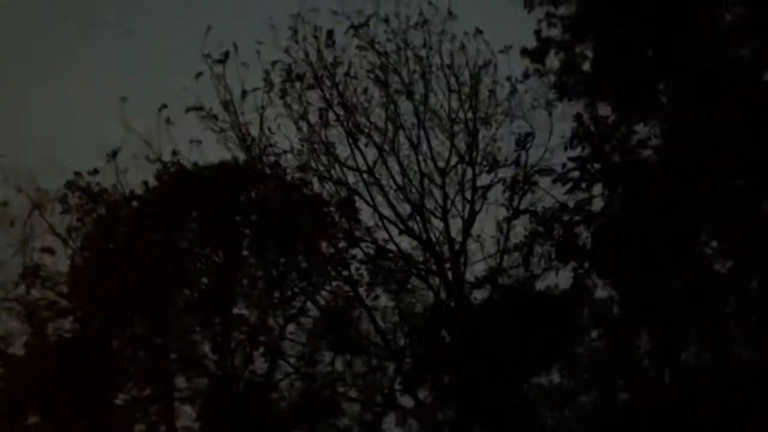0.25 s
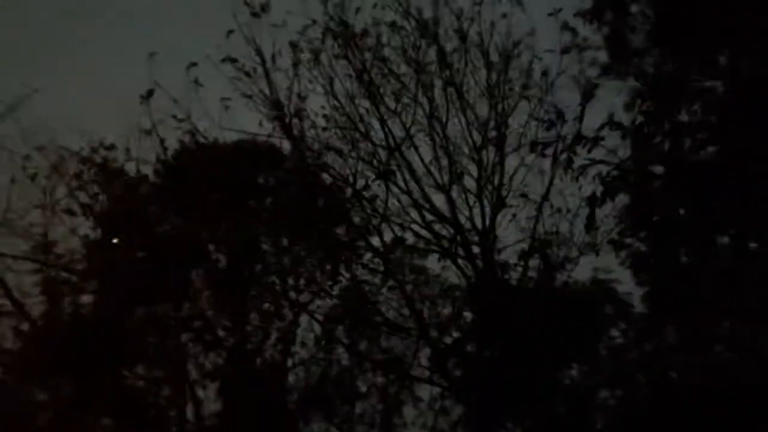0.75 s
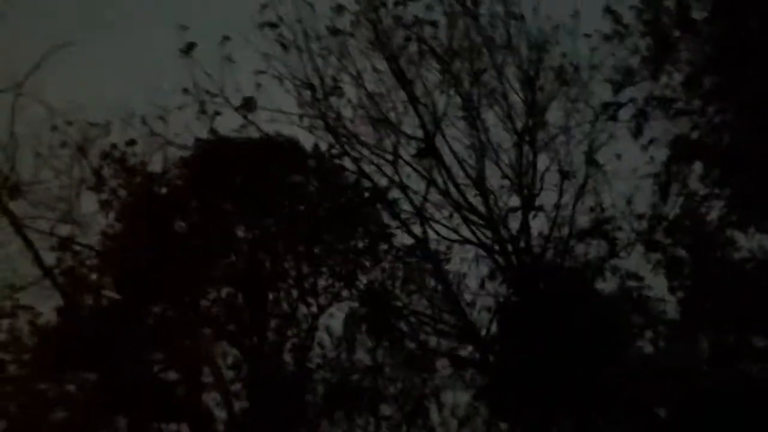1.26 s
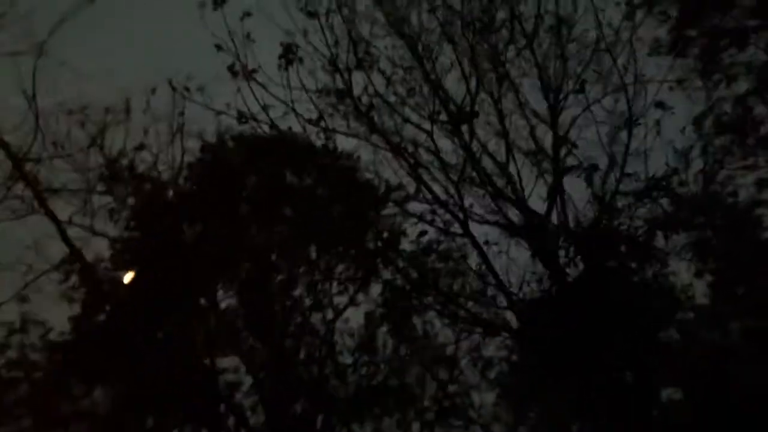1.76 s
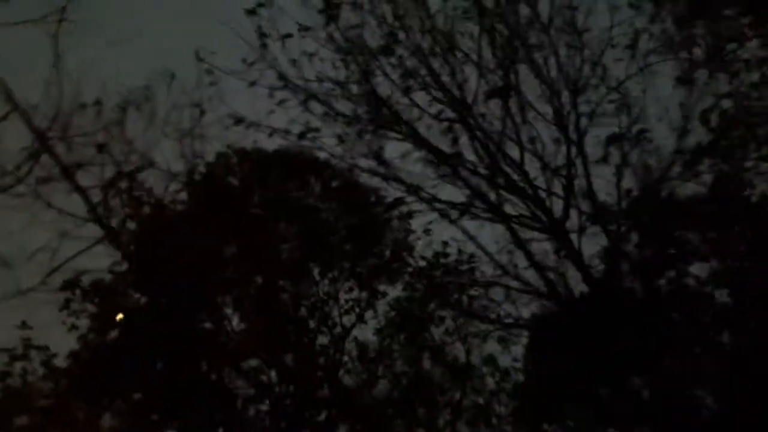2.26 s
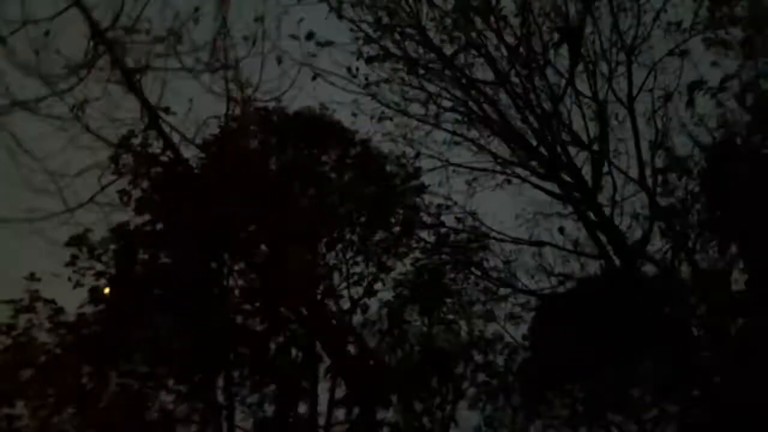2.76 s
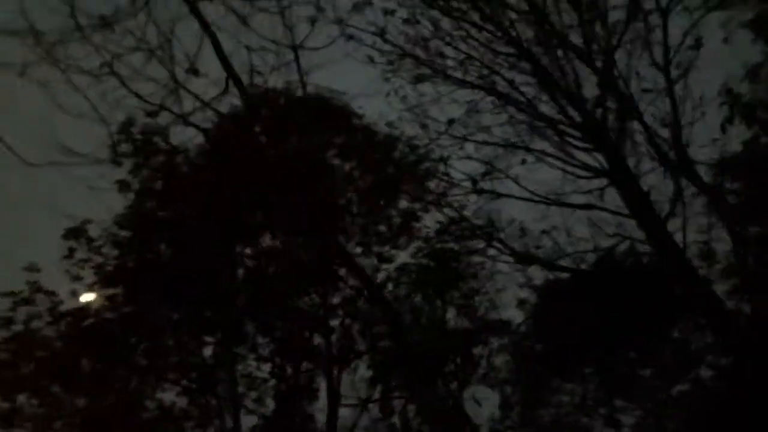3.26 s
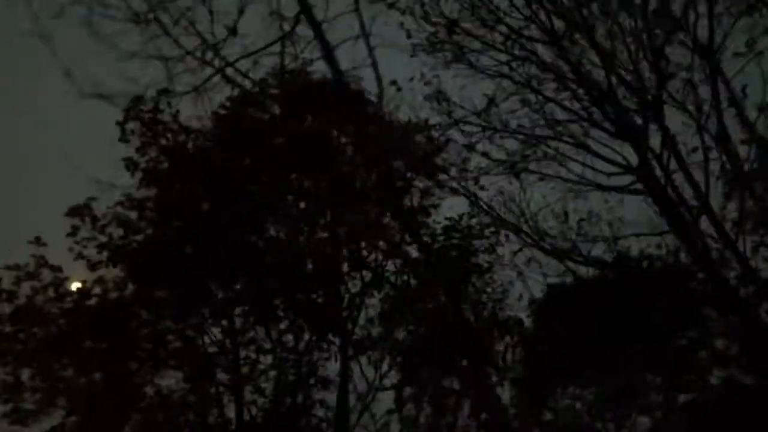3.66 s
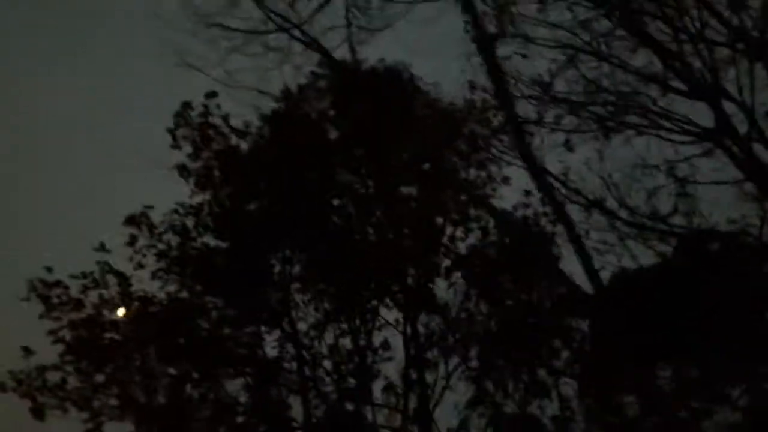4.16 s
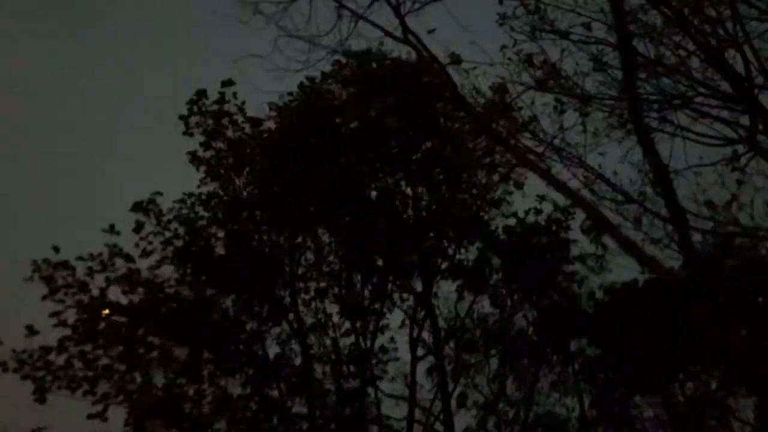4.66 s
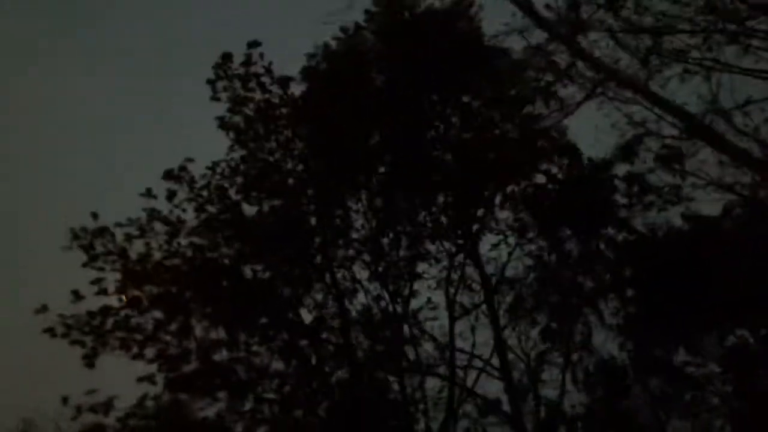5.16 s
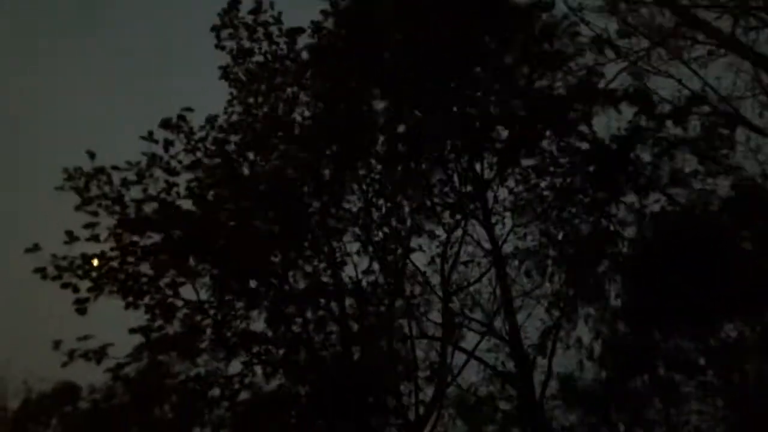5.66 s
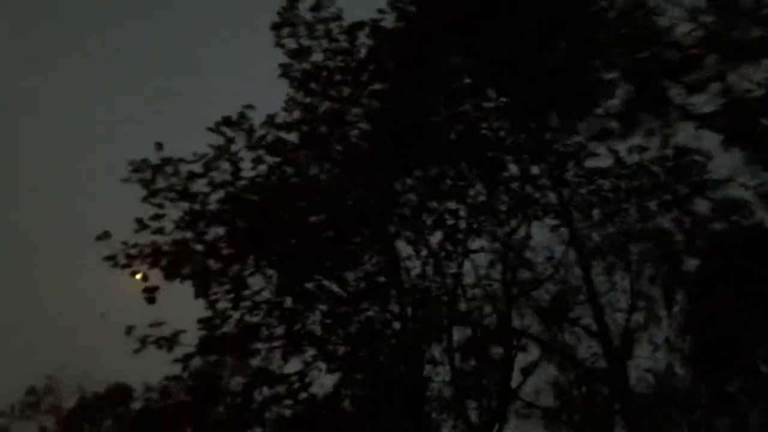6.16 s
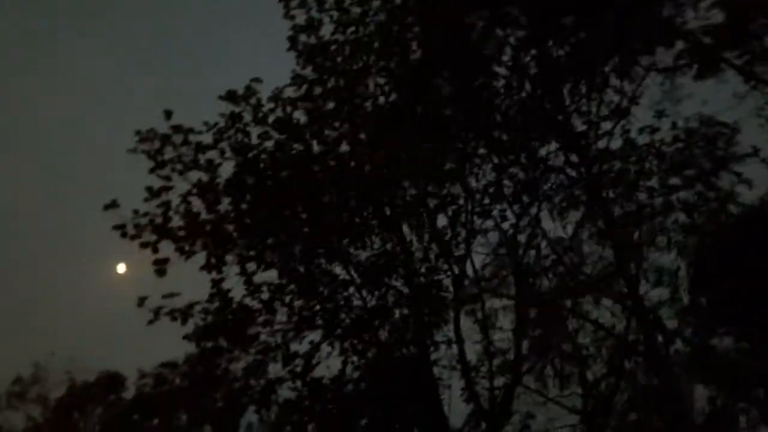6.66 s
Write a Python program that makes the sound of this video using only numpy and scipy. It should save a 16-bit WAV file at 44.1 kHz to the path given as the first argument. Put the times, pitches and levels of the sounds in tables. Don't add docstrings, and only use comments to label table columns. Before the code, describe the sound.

Thousands of birds twitter together in a continuous bright wash outdoors, pierced by close pips, swoops and hoarse calls, with light taps on the microphone.

```python
import sys
import numpy as np
from scipy import signal
from scipy.fft import rfft, irfft
from scipy.io import wavfile

SR = 44100
rng = np.random.default_rng(int(sys.argv[2]) if len(sys.argv) > 2 else 0)


def makeup_ratio(level_db):
    decades = np.asarray(level_db, float) / 20
    return 10 ** decades


def dump_mix(stems):
    frames = np.atleast_2d(stems).T
    limited = np.clip(frames, -1, 1)
    pcm = np.round(limited * 32767).astype(np.int16)
    wavfile.write(sys.argv[1], SR, pcm)


N = 304290


def rms_one(x):
    return x / np.sqrt(np.mean(x ** 2) + 1e-20)


def at_hz(points, hz):
    points_hz, level_db = np.transpose(points)
    return np.interp(np.log(hz), np.log(points_hz), level_db)


def drift(rate_hz):
    coarse = 40
    pole = np.exp(-2 * np.pi * rate_hz * coarse / SR)
    noise = rng.standard_normal(N // coarse + 2002)
    slow = signal.lfilter([1], [1, -2 * pole, pole * pole], noise)[2000:]
    return np.interp(np.arange(N) / coarse, np.arange(len(slow)), rms_one(slow))


def band_pass(x, order, low_hz, high_hz):
    return signal.sosfilt(signal.butter(order, [low_hz, high_hz], "band", fs=SR, output="sos"), x)


def glided(notes, per_s=0, sag=0):
    start, length, hz, level_db = np.transpose(notes)[:4]
    half = per_s * length / 2
    first_hz = hz * (1 - sag - half)
    last_hz = hz * (1 - sag + half)
    return np.transpose([start, length, first_hz, hz, last_hz, level_db])


def whistles(notes, edge, hoarse, hoarse_rate):
    start, length, first_hz, mid_hz, last_hz, level_db = np.array(notes, float).T[:, :, None]
    start, length = start - edge * length / 2, length * (1 + edge)
    steps = np.arange(int(length.max() * SR) + 1)
    u = np.clip(steps / SR / length, 0, 1)
    hz = first_hz * (1 - u) * (1 - 2 * u) + mid_hz * 4 * u * (1 - u) + last_hz * u * (2 * u - 1)

    chance = rng.random((len(notes), 2))
    shake_from = (chance[:, :1] * N).astype(int)
    shake = hoarse * drift(hoarse_rate)[(shake_from + steps) % N]
    phase = 2 * np.pi * (np.cumsum(hz, axis=1) / SR + chance[:, 1:]) + shake
    tone = (1 + shake[::-1] / 2) * np.sin(phase)
    soft_edges = np.clip(np.minimum(u, 1 - u) / edge, 0, 1)
    swell = np.sqrt(np.sin(np.pi * u).clip(0)) * soft_edges

    swell_energy = np.sum(swell ** 2, axis=1, keepdims=True)
    note_energy = np.sum((swell * tone) ** 2, axis=1, keepdims=True)
    gain = makeup_ratio(level_db) * np.sqrt(swell_energy / note_energy)
    at = np.clip((start * SR).astype(int) + steps, -1, N) % (N + 1)
    return np.bincount(at.ravel(), (gain * swell * tone).ravel(), N + 1)[:N]


def wash(spectrum, low_hz, patchy_db, patch_rate, swell_db, count):
    white, together, out = rng.standard_normal((2, N)), drift(7.4), 0
    edges = low_hz * 2 ** (np.arange(count + 1) / 4)
    for k, (low, high) in enumerate(zip(edges, edges[1:])):
        band = band_pass(white[k % 2], 3, low, high)
        patches_db = patchy_db * (0.51 * together + drift(patch_rate))
        out = out + band * makeup_ratio(swell_db(np.sqrt(low * high)) + patches_db)
    hz = np.maximum(np.fft.rfftfreq(N, 1 / SR), 10)
    return rms_one(irfft(rfft(out) * makeup_ratio(at_hz(spectrum, hz)), N))


# t/s, level/dB
ROOST_SWELL = [(0.0, -28.5), (0.57, -30), (1.04, -28.5), (1.29, -29.5), (2.59, -29), (3.02, -30),
               (3.52, -30), (3.76, -30.5), (4.63, -30), (4.86, -30), (5.01, -31), (5.65, -31),
               (5.78, -30.5), (6.34, -30), (6.9, -30)]
VOICE_HZ = [1700, 3000, 3850, 4650, 6400, 11000]
ROOST_FOLLOW = [0.9, .5, 0.37, .5, .4, 1]
# t/s, level/dB
LOW_BOUTS = [(.6, 4.5), (1.35, 5.5), (2.25, 4), (2.8, 3.5), (3.2, -2), (3.4, 2.5), (3.9, 0.5), (4.5, 5),
             (5.35, 2.5), (5.6, -3), (6., -2), (6.4, 2)]
MIDDLE_BOUTS = [
    (.5, 0.92),
    (.95, -0.71),
    (1.9, 0.7),
    (2.45, 1.5),
    (3.0, -1),
    (3.6, -1.5),
    (4.5, -1),
    (5.2, -0.32),
    (6.4, 1),
]
BRIGHT_BOUTS = [
    (.2, -1),
    (1.55, -1.2),
    (1.95, 1),
    (2.65, 1.5),
    (3.05, -0.52),
    (3.55, 1.8),
    (3.95, -2.3),
    (5.35, -0.2),
    (6.05, 1.4),
    (6.8, 0.35),
]
SHRILL_BOUTS = [(.25, -1.8), (.75, 0.6), (1.25, 1.2), (1.8, 2.1), (2.75, 0.84), (3.4, 1), (3.82, -1.5),
                (4.1, .8), (4.75, 0.74), (5.45, -2.7), (6.3, 0.13), (6.85, -1.7)]
HIGH_BOUTS = [(1.05, 1), (1.35, 1), (1.8, 1), (2.2, 0.5), (2.6, 0.5), (3.2, 1.5), (4.2, -1), (4.75, 0),
              (5.4, 2.5), (5.6, -3), (6.2, 3.5)]
OVERTONE_BOUTS = [
    (.8, 2),
    (1.25, 4),
    (1.9, 6.5),
    (2.4, 3.5),
    (3.35, 2),
    (5.5, -2),
    (6., -0.5),
    (6.4, 2),
]


def liveliness_db(s, hz):
    bout_s = 0.27
    times, level_db = np.transpose(ROOST_SWELL)
    roost_db = np.interp(s, times, level_db) - level_db.mean()
    place = np.interp(np.log(hz), np.log(VOICE_HZ), np.arange(len(VOICE_HZ)))
    ranges = [LOW_BOUTS, MIDDLE_BOUTS, BRIGHT_BOUTS, SHRILL_BOUTS, HIGH_BOUTS, OVERTONE_BOUTS]
    out = 0
    for k, bouts in enumerate(ranges):
        share = np.clip(1 - abs(place - k), 0, 1)
        if np.any(share):
            bout_db = sum(np.interp(s, [at - bout_s, at, at + bout_s], [0, db, 0]) for at, db in bouts)
            out = out + share * (ROOST_FOLLOW[k] * roost_db + bout_db)
    return out


# f/Hz, level/dB (per Hz)
CHORUS_COLOUR = [(800, -31.5), (1400, -10.5), (2400, -6.5), (3050, -1.5), (3500, -2), (4650, -0.5),
                 (5200, -8.5), (6200, -11), (7600, -15.5), (7800, -27), (7950, -32.5), (8500, -27),
                 (9800, -44), (11800, -37), (13400, -48), (14800, -48.5)]


def far_flock(spread_db, glide, count=5200):
    when, pitch, length = rng.random((count, 3)).T
    bend, slope, size = rng.standard_normal((count, 3)).clip(-2, 2).T
    s = when * (N / SR + .05) - .05
    hz = 950 + 14700 * pitch ** 1.5
    density_db = 5 * np.log10(pitch + .02)
    level_db = at_hz(CHORUS_COLOUR, hz) + liveliness_db(s, hz) + spread_db * size + density_db
    first_hz, last_hz = hz * (1 - glide * slope), hz * (1 + glide * slope)
    mid_hz = hz * (1 + glide * bend / 2)
    notes = np.transpose([s, .02 + 0.067 * length ** 2, first_hz, mid_hz, last_hz, level_db])
    return rms_one(whistles(notes, .3, .3, 100))


def roost_wash(s):
    scold_db, scold_from_hz = scolding_db(s), 5000

    def swell_db(hz):
        return liveliness_db(s, hz) + scold_db * (hz > scold_from_hz)

    return makeup_ratio(-31.5) * wash(CHORUS_COLOUR, 600.7, 0.24, 4.7, swell_db, count=19)


def trees(x, t60):
    s = np.arange(SR // 2) / SR
    tail = rng.standard_normal(len(s)) * makeup_ratio(-60 * s / t60) * (s > .008)
    return signal.fftconvolve(x, tail / np.sqrt(np.sum(tail ** 2)))[:N]


# f/Hz, level/dB (per Hz)
AIR_COLOUR = [(25, -37), (60, -15), (100, -13), (172, -16), (280, -19.5), (340, -18.5), (540, -26),
              (670, -19.5), (780, -25), (1000, -19.5), (1300, -29), (1700, -35)]
# t/s, level/dB
GUSTS = [
    (0.0, -46.5),
    (0.55, -48),
    (4.04, -49),
    (6.9, -49),
]


def wind(s):
    gust_db = np.interp(s, *np.transpose(GUSTS))
    gust_db = gust_db - gust_db.mean()
    return makeup_ratio(-47) * wash(AIR_COLOUR, 19.8, 1.6, 10.0,
                           lambda hz: gust_db * np.clip(1.3 - hz / 500, 0, 1), count=27)


# f/Hz, width/Hz, level/dB
DUCT_MURMUR = (677, 57, -64.5)


def hum():
    level_db = -61.5 - 0.5 * drift(2.8)
    pitch_hz = 170.6 + 2.5 * drift(2.56)
    tone = makeup_ratio(level_db) * np.sqrt(2) * np.sin(2 * np.pi * np.cumsum(pitch_hz) / SR)
    hz, width_hz, duct_db = DUCT_MURMUR
    duct = band_pass(rng.standard_normal(N), 2, hz - width_hz / 2, hz + width_hz / 2)
    return tone + makeup_ratio(duct_db) * rms_one(duct)


def knocks(events, cycles, gain_db, low_hz, high_hz):
    out, s = np.zeros(N + SR), np.arange(SR // 10) / SR
    for at, level_db, hz in events:
        ring = np.sin(2 * np.pi * hz * s) * makeup_ratio(level_db + gain_db - 60 * s * hz / cycles)
        out[round(at * SR):][:len(s)] += ring
    return band_pass(out[:N], 2, low_hz, high_hz)


# t/s, level/dB (peak), f/Hz (ring)
HAND_BUMPS = [(0.014, -33, 166), (0.42, -36, 136), (0.552, -26.5, 313), (0.903, -36, 175),
              (1.35, -31.5, 132), (1.37, -31, 81.8), (1.4, -31, 105), (1.435, -31, 78), (1.53, -27, 320),
              (1.536, -38, 170), (1.989, -34, 99), (2.027, -31.5, 82), (2.232, -30, 113), (2.291, -32, 121),
              (3.335, -39, 201), (4.854, -32, 87.5), (4.933, -46, 96.9), (5.82, -31, 222),
              (5.837, -27, 139), (6.3, -31, 169), (.34, -31.5, 200), (.6, -32, 70), (2.05, -36, 95),
              (2.27, -37, 300), (5.28, -40, 189), (5.862, -38, 180), (5.98, -37, 100), (6.213, -35.5, 220),
              (4.47, -38, 300), (1.385, -35, 330), (3.66, -39, 350)]
# t/s, level/dB (peak), f/Hz (ring)
HAND_TICKS = [(0.552, -20, 620), (1.338, -19.5, 1390), (1.541, -22.5, 1120), (1.548, -26, 900),
              (1.563, -28, 1100), (1.569, -31, 600), (3.278, -24, 1400), (4.248, -26, 1100),
              (4.318, -25, 1380), (5.765, -25, 1750), (6.215, -22, 1350), (6.216, -47, 597),
              (.553, -29, 1400), (2.84, -34, 550), (3.59, -36, 600), (2.0, -36, 900), (1.53, -33, 900)]


def hand():
    return knocks(HAND_BUMPS, 3.3, 7.6, 91, 1440) + knocks(HAND_TICKS, 4.1, 3.0, 130, 2600)


# t/s, length/s, f/Hz (middle), level/dB, glide/share per s
SLURS = [(.035, 0.082, 2350, -36, 2.5), (.52, 0.094, 3130, -34.5, 0.), (1.148, 0.012, 5450, -33, -2.),
         (1.773, .06, 4590, -34, 1.), (1.072, 0.13, 2123, -41.5, 0.5), (1.216, 0.038, 2850, -35, 1),
         (1.28, 0.053, 4170, -37, 2.5), (1.502, 0.033, 1895, -36, -7.5), (1.33, 0.078, 4600, -37, 2.5),
         (1.44, 0.047, 2770, -33, -1), (1.831, .018, 4660, -26.5, -4.5), (1.927, 0.026, 2410, -39, -8.5),
         (1.946, .04, 3780, -30, 2.5), (1.946, 0.029, 2010, -30.5, -10), (2.184, 0.022, 4450, -26.5, -2.5),
         (2.35, 0.049, 3080, -30, 2.5), (2.46, 0.066, 2710, -32, -1), (2.52, .016, 3040, -32, 4),
         (3.648, 0.078, 4020, -36, 2), (3.811, 0.045, 3230, -38, 1), (4.235, .04, 3130, -38, -0.5),
         (4.381, 0.054, 4760, -29, 1), (4.642, .046, 4400, -30, 3), (4.89, .06, 4000, -38, 1.5),
         (4.95, .06, 4230, -33, 3), (3.895, .03, 4180, -34.5, 1), (4.143, 0.068, 2380, -40.5, 1.5),
         (5.362, .045, 3340, -36, 0), (5.88, 0.07, 3950, -40, 3.5), (5.943, 0.018, 4210, -31, -1.),
         (6.05, .03, 2900, -39, -1.5), (6.233, 0.031, 4260, -30, 4), (6.379, 0.055, 2936, -34, 1.5),
         (6.431, 0.067, 3200, -40, 1.5), (6.512, .025, 3280, -32, -4), (6.127, 0.055, 3770, -35, 0),
         (6.767, 0.075, 3220, -37, 0), (6.345, 0.14, 1877, -42, 1), (2.566, 0.1, 4600, -37, 0.5),
         (2.712, 0.084, 4890, -40, 0.5)]


def slurs():
    return whistles(glided(SLURS, np.transpose(SLURS)[-1]), .25, .45, 140)


# t/s, length/s, f/Hz, level/dB
SEEPS = [(0.22, .028, 7200, -46), (.496, .031, 7540, -49), (1.804, .022, 7000, -42),
         (1.887, .028, 7670, -52), (1.942, .037, 7540, -41), (2.358, .036, 7540, -47),
         (2.424, .022, 7780, -48), (2.492, .042, 7500, -50), (4.91, .022, 7230, -43),
         (5.753, .029, 7360, -44), (6.039, .025, 7560, -48), (6.174, .05, 7520, -51)]
# t/s, length/s, f/Hz, level/dB
TWEETS = [(.34, 0.042, 6850, -41), (.47, 0.033, 6100, -40), (0.481, 0.018, 5730, -39),
          (.505, .022, 6970, -43), (1.545, 0.02, 6540, -40), (1.809, 0.051, 5970, -39),
          (1.859, 0.034, 6560, -41), (1.875, .058, 5830, -46), (2.139, .017, 5770, -41),
          (2.148, .05, 6460, -40), (2.344, 0.086, 6230, -43), (2.728, 0.04, 6600, -40),
          (3.175, 0.06, 5540, -39.5), (3.31, 0.032, 6360, -41), (3.341, .015, 6830, -40),
          (3.341, 0.046, 5680, -45), (3.892, .054, 6130, -43), (3.994, 0.049, 6180, -40.5),
          (4.29, .025, 5880, -49), (4.506, 0.04, 6070, -42), (4.772, .074, 6140, -44.5),
          (4.852, .016, 6500, -42), (4.886, .025, 6200, -40), (5.22, .04, 5750, -41),
          (5.316, 0.051, 6570, -42), (6.15, .055, 5880, -38), (6.161, 0.041, 6580, -40),
          (6.214, .086, 5880, -44)]


def seeps_and_tweets():
    return whistles(glided(np.vstack([SEEPS, TWEETS])), .25, .75, 150)


# t/s, level/dB
SCOLDS = [(.23, 3), (.37, 2.5), (.5, 1), (1.0, 2), (1.14, 2), (1.42, 2), (1.56, 4), (1.7, 1.5), (1.82, 4),
          (1.96, 1.5), (2.09, 2), (2.24, 2.5), (2.38, 1.5), (2.5, 3), (3.34, 3.5), (4.3, 2.5), (4.37, 1),
          (4.9, 2), (5.25, 3.5), (5.76, 2), (6.05, -1), (6.19, 2), (6.36, 1.5), (6.49, 0)]


def scolding_db(s):
    half_width_s = 0.043
    return sum(db * np.exp(-((s - at) / half_width_s) ** 2) for at, db in SCOLDS)


# t/s, length/s, f/Hz, level/dB
PIPS = [(.322, 0.02, 3460, -32), (.779, .11, 3560, -42), (1.17, .036, 2580, -36), (1.415, 0.015, 4950, -34),
        (2.493, 0.027, 3340, -33), (3.527, .022, 4470, -25.5), (3.795, .018, 2560, -38),
        (3.93, 0.033, 2810, -38), (3.968, 0.051, 2860, -35.5), (4.841, 0.027, 3300, -32),
        (5.23, .045, 4440, -34), (5.693, .014, 2400, -39), (5.802, 0.02, 2927, -26.5),
        (5.866, .028, 3700, -37), (6.036, 0.028, 3820, -29.5), (6.343, 0.033, 4850, -37.5)]


def pips():
    return whistles(glided(PIPS), .25, .45, 140)


# t/s, length/s, f/Hz, level/dB
THIN_NOTES = [(.352, .02, 8000, -52), (1.099, .025, 11930, -57), (1.126, .033, 12050, -61),
              (1.42, .055, 8330, -54), (1.943, .039, 11350, -66), (2.432, .02, 11330, -56),
              (2.447, .055, 8270, -52), (2.486, .025, 10770, -65), (2.74, .06, 10000, -72),
              (3.296, .038, 10900, -59), (3.371, .061, 11920, -60), (3.972, .038, 10920, -63),
              (4.226, 0.052, 9400, -67), (4.317, .078, 10360, -79), (4.352, .038, 10830, -61),
              (4.389, .026, 9370, -60), (6.271, .022, 9950, -69), (6.876, .023, 10230, -72)]


def thin_notes():
    return whistles(glided(THIN_NOTES), 0.29, 0.76, 200)


# t/s, level/dB, f/Hz (centre)
RASPS = [(.37, -73, 14000), (.37, -66, 8300), (.64, -70, 14500), (.96, -72, 14300), (1.13, -67, 11900),
         (1.57, -74, 14800), (1.7, -74, 14500), (1.85, -67, 12000), (1.96, -71, 15200), (2.1, -70, 14500),
         (2.24, -70, 14500), (2.39, -69, 14800), (2.47, -68, 11500), (2.53, -73, 14500), (3.37, -70, 11800),
         (3.43, -70, 15400), (3.54, -66, 13200), (4.0, -66, 11000), (4.35, -69, 14900), (4.36, -64, 11100),
         (4.65, -65, 11500), (4.9, -68, 12000), (5.25, -68, 11800), (6.03, -64, 11600), (6.05, -74, 15300),
         (6.17, -71, 15300), (6.2, -66, 11500), (6.5, -72, 15200), (6.5, -66, 11700)]


def rasps(s, width_s, spread_hz):
    low_pass = signal.butter(2, spread_hz, fs=SR, output="sos")
    hiss = rms_one(signal.sosfilt(low_pass, rng.standard_normal(N)))
    carriers = 0
    for at, level_db, hz in RASPS:
        puff = makeup_ratio(level_db) * np.exp(-((s - at) / width_s) ** 2)
        carriers = carriers + puff * np.sin(2 * np.pi * hz * s)
    return hiss * carriers


# t/s, length/s, f/Hz (middle), level/dB, glide/share per s
CROAKS = [(0.375, .03, 3200, -31, -0.5), (0.528, 0.063, 2020, -38.5, 0.5), (1.066, 0.03, 1945, -37, -0.5),
          (1.144, .1, 2110, -37, 0.5), (1.486, .05, 2200, -38, -7), (1.518, 0.085, 4670, -32.5, 1),
          (1.9, .06, 3310, -36, 0.5), (1.853, 0.098, 3030, -30.5, -0.5), (4.027, .07, 4720, -33.5, 0),
          (4.867, .07, 4750, -32, -2.5), (2.043, 0.12, 1195, -44, 1), (2.092, .025, 3100, -31.5, 0),
          (2.207, 0.065, 3070, -35, 2), (2.229, 0.12, 1603, -40, -1), (2.308, 0.081, 1650, -46, -0.5),
          (2.832, 0.0714, 1220, -45, 1), (3.937, 0.067, 1155, -47, -0.5), (4.418, .12, 1520, -42.5, -1),
          (4.425, .1, 1026, -48, 1), (6.271, .11, 2424, -36, 2.5), (6.327, 0.22, 2074, -44, 1.5),
          (6.491, 0.038, 1815, -43, -2.5)]


def croaks():
    return whistles(glided(CROAKS, np.transpose(CROAKS)[-1]), .21, 1.4, 260)


# t/s, length/s, f/Hz (middle), level/dB
RISERS = [
    (.472, 0.039, 4980, -37),
    (2.783, 0.037, 4290, -29),
    (3.708, 0.019, 4000, -31),
    (4.872, 0.029, 3940, -29),
    (5.201, 0.029, 5370, -39),
    (5.58, 0.043, 4130, -31.5),
]
# t/s, length/s, f/Hz (middle), level/dB
FALLERS = [
    (.894, .016, 2480, -38),
    (3.201, 0.042, 4460, -28.5),
    (4.924, .016, 3960, -25.5),
    (5.388, 0.013, 2530, -36),
]
# t/s, length/s, f/Hz (top), level/dB
ARCHES = [
    (1.097, .056, 6170, -30),
]
# t/s, length/s, f/Hz (middle), level/dB, direction (up 1, down -1)
SWOOPS = [
    (1.705, .025, 3300, -31, -1),
    (2.695, .022, 4250, -33, -1),
    (5.21, .03, 5700, -43, 1),
]


def chirps():
    glides = np.vstack([glided(RISERS, 2.66), glided(FALLERS, -2.5), glided(ARCHES, sag=.105),
                        glided(SWOOPS, 7 * np.transpose(SWOOPS)[-1])])
    return whistles(glides, .2, .35, 90)


# t/s, length/s, f/Hz (middle), level/dB, glide/share per s
STRAINS = [(.59, .05, 2024, -41, 0.), (.8, 0.16, 6730, -44, 0.5), (1.137, 0.086, 4720, -35, 1),
           (1.25, 0.026, 4680, -38, 1.), (1.872, .022, 4400, -31, 0.5), (1.91, 0.057, 4800, -39, 1.),
           (1.942, .035, 3100, -32, 1), (1.99, .02, 3900, -38, -3), (3.55, 0.09, 4480, -38, 1),
           (3.601, .1, 6980, -47, -.3), (3.69, .04, 5300, -38, 3), (3.728, .06, 3900, -41, -1.),
           (3.88, .06, 2800, -42, .5), (4.012, .06, 2990, -37, 2), (4.098, 0.065, 4680, -39, 1),
           (4.799, 0.04, 4650, -34, -.5), (1.73, 0.043, 3870, -37, 1.5), (5.24, .04, 6500, -45, 3.),
           (4.717, .06, 2916, -40, 3), (2.285, .04, 4750, -35, 1), (2.645, .05, 4500, -38, -1.5),
           (2.1, .03, 4600, -32, -2.), (1.9, .02, 3700, -35, 2.), (6.21, .03, 3180, -36, -1),
           (6.24, 0.031, 4070, -31, 1), (6.5, .04, 4210, -36, -.5)]


def strains():
    return whistles(glided(STRAINS, np.transpose(STRAINS)[-1]), .25, .9, 200)


# t/s, width/s, level/dB
HUSH = (5.716, .012, -4)


def hush(s):
    at, width_s, level_db = HUSH
    return makeup_ratio(level_db * np.exp(-((s - at) / width_s) ** 2))


def scene():
    s = np.arange(N) / SR
    far = makeup_ratio(-37.5) * far_flock(spread_db=1.8, glide=.035)
    flock = far + makeup_ratio(-1.0) * trees(far, 0.69)
    blur = roost_wash(s)
    rest = wind(s) + hum() + hand()
    near = slurs() + seeps_and_tweets() + pips() + thin_notes() + croaks() + chirps() + strains()
    near = makeup_ratio(-0.94) * near
    near = near + makeup_ratio(-4.5) * trees(near, 0.28)
    rest = rest + makeup_ratio(3) * rasps(s, 0.047, 650)
    return (hush(s) * (near + flock + blur) + rest)[None]


def band_limit(x):
    return signal.sosfilt(signal.butter(12, 16590, fs=SR, output="sos"), x)


def record(dry):
    below_top = np.fft.rfftfreq(N, 1 / SR) < 15720
    cut = irfft(rfft(dry) * below_top, N)
    return band_limit(cut - .0007)


dry = scene()
out = record(dry)
dump_mix(out)
```